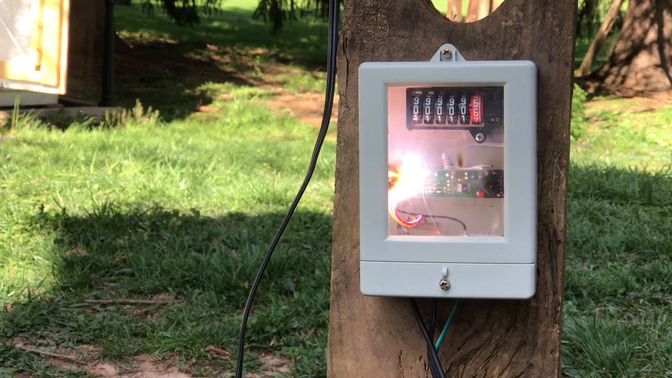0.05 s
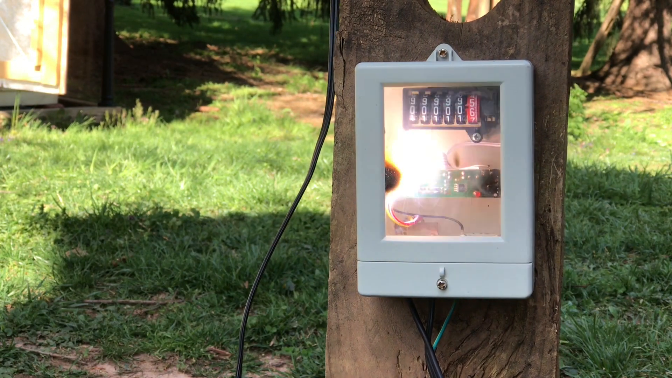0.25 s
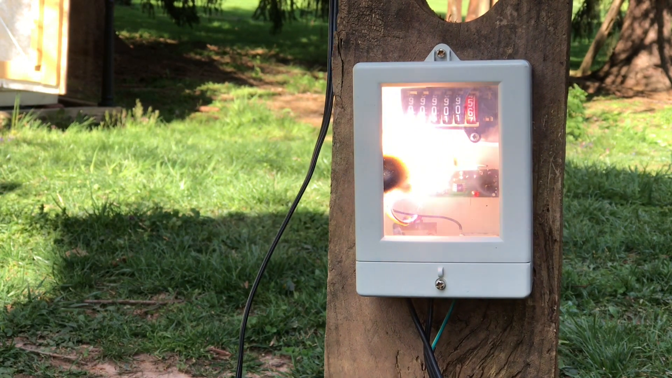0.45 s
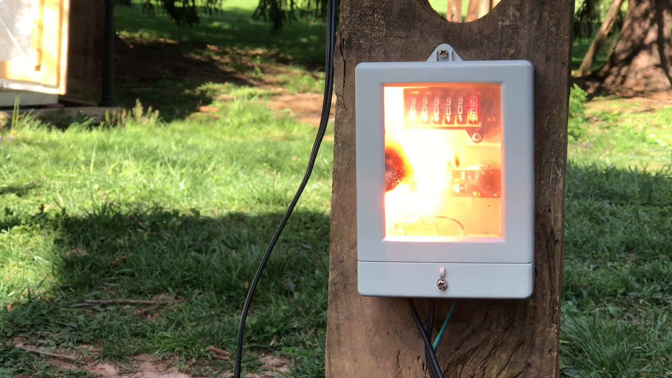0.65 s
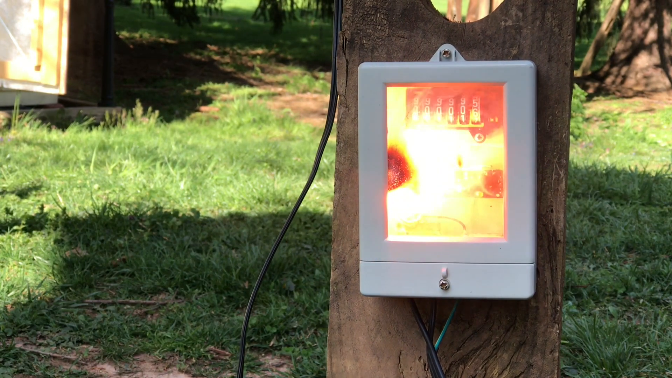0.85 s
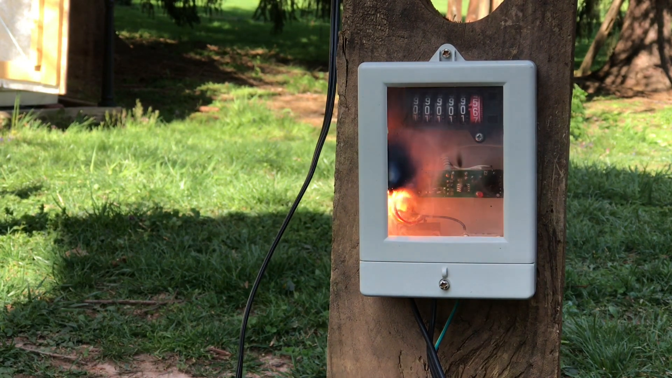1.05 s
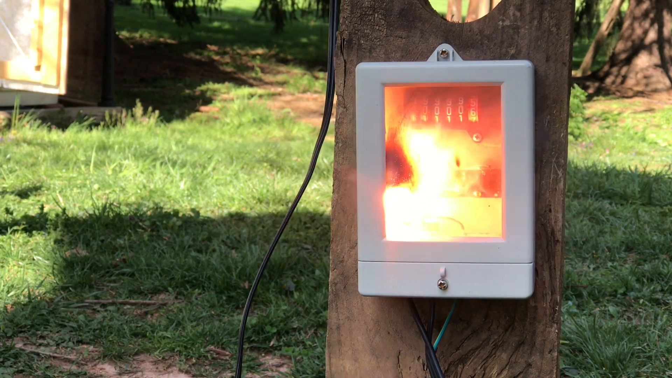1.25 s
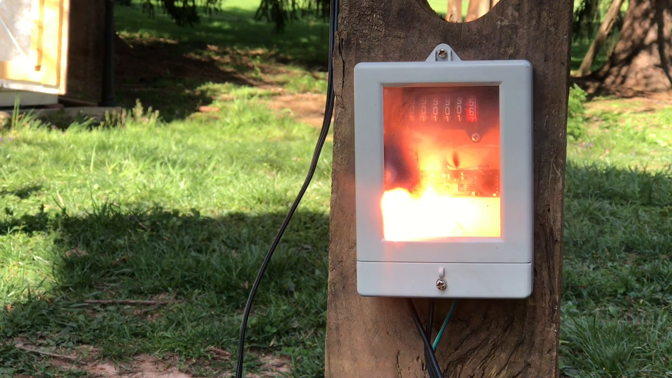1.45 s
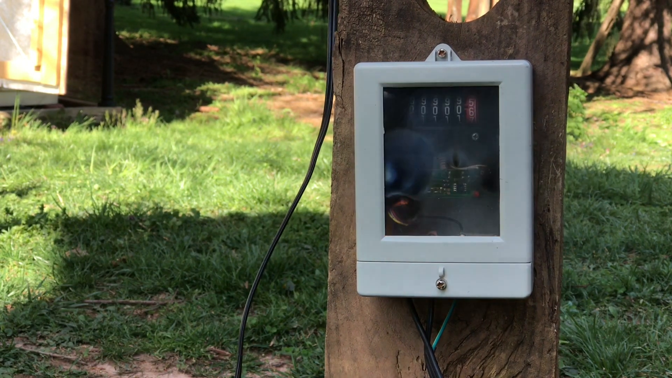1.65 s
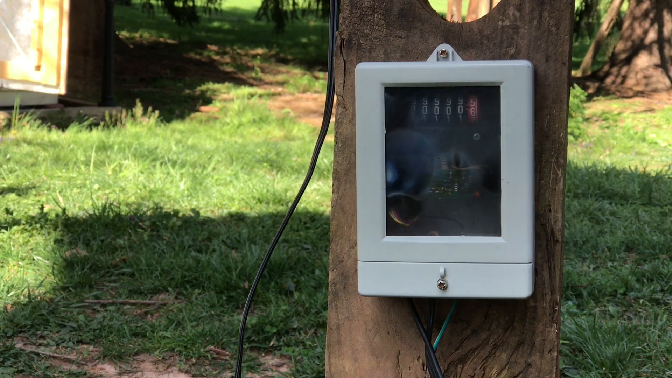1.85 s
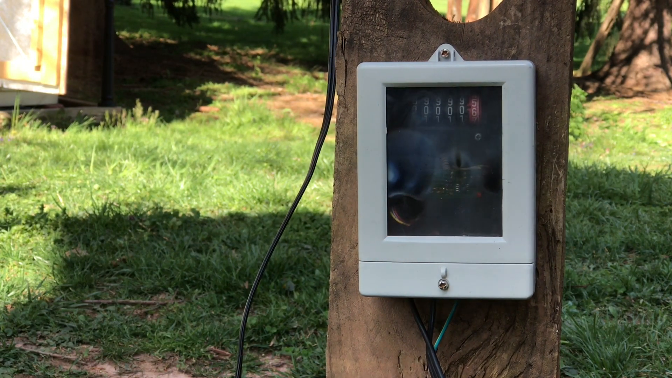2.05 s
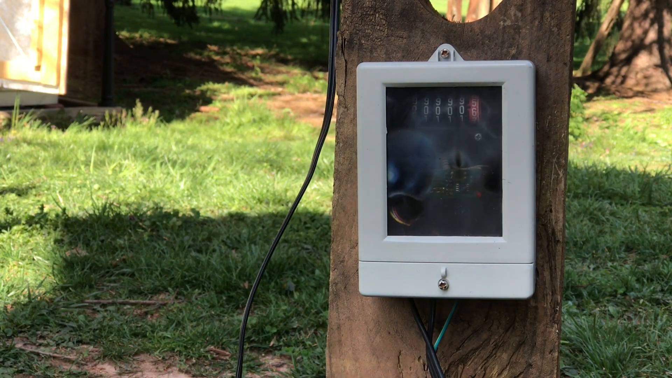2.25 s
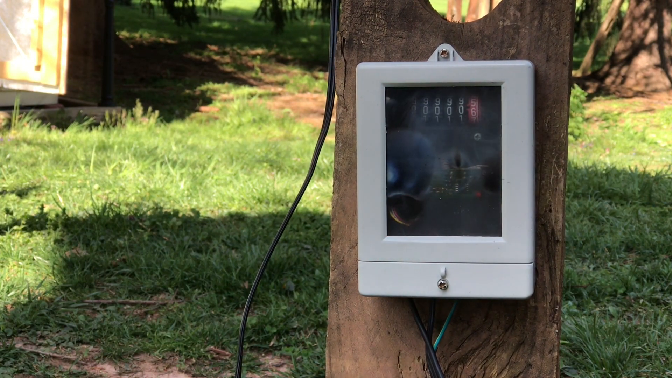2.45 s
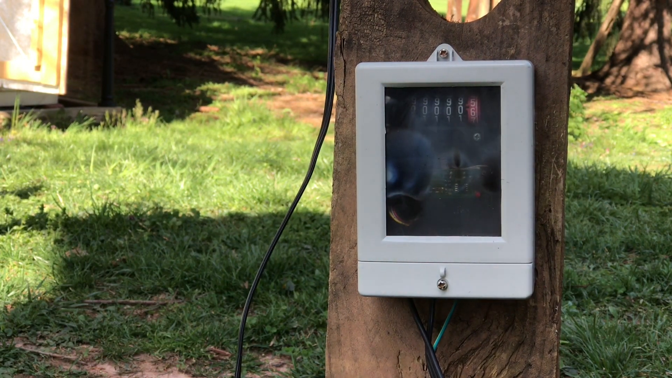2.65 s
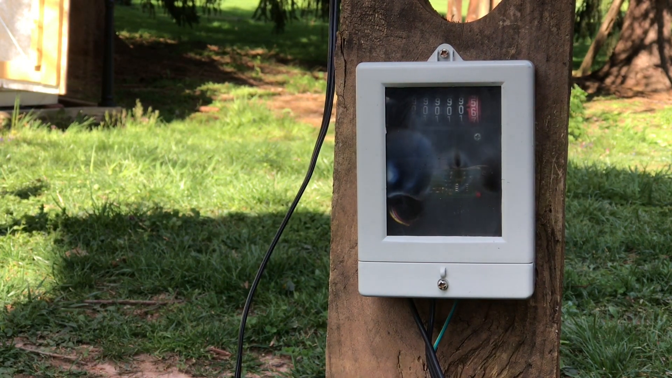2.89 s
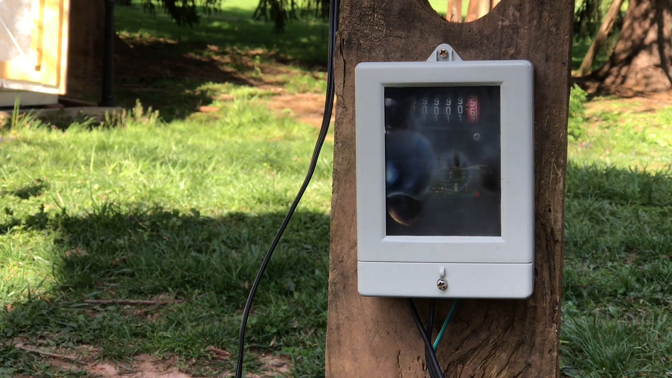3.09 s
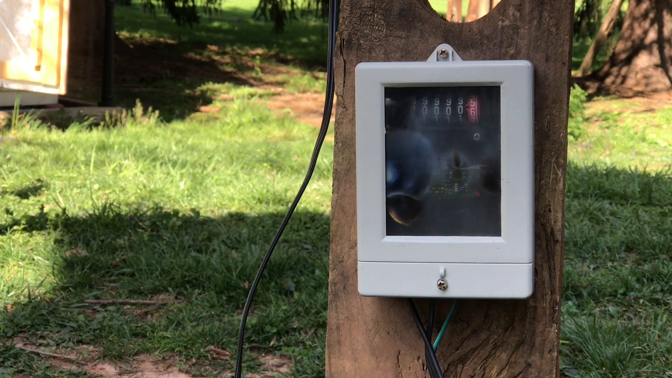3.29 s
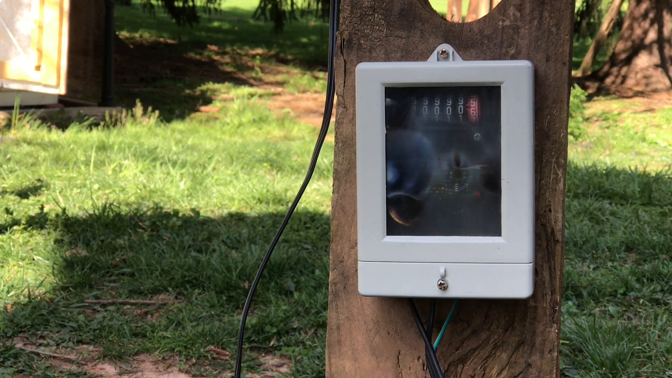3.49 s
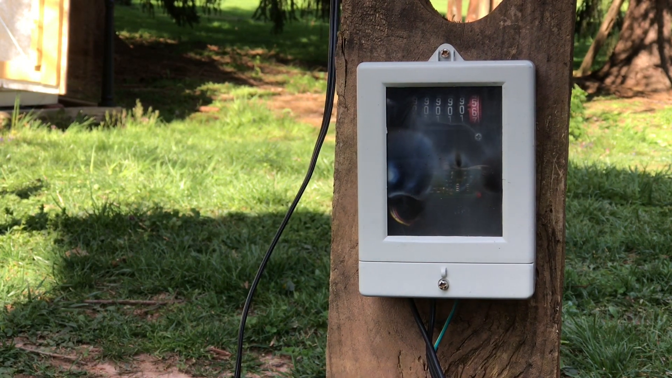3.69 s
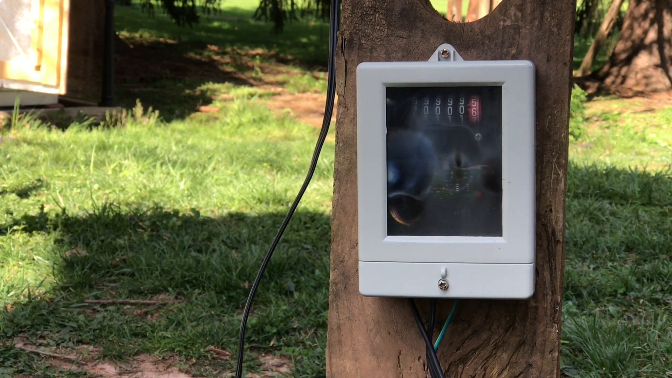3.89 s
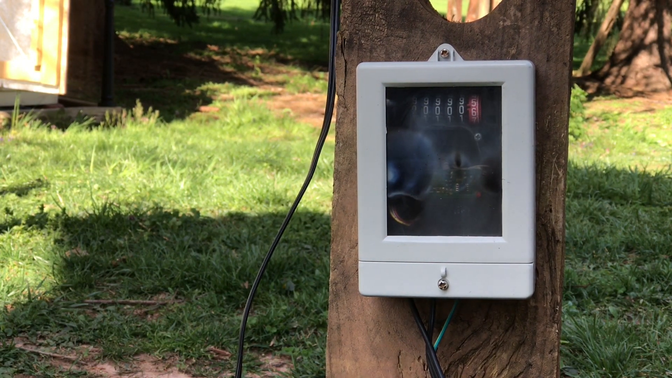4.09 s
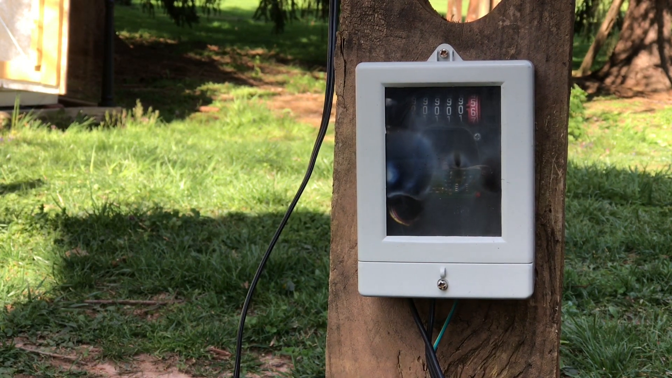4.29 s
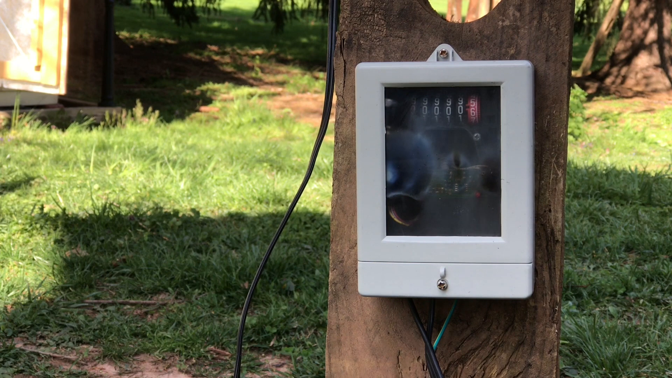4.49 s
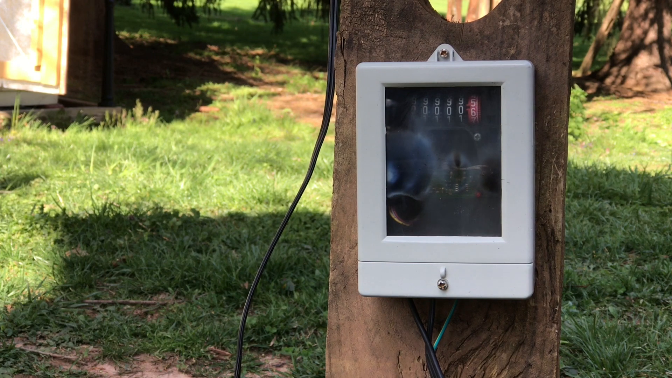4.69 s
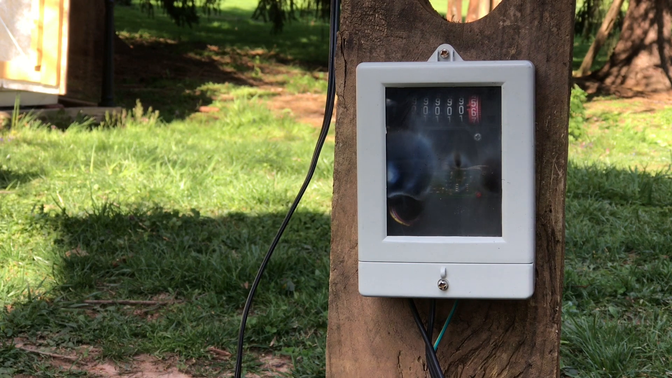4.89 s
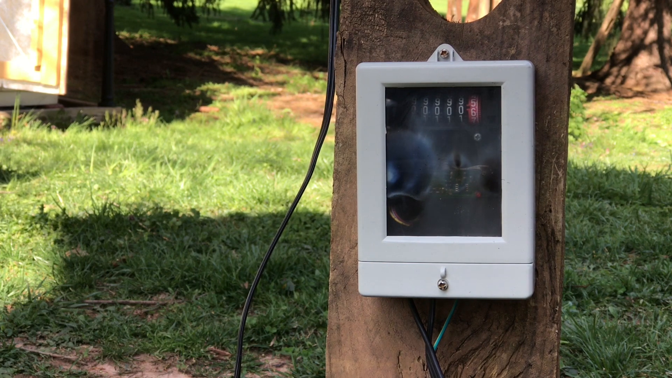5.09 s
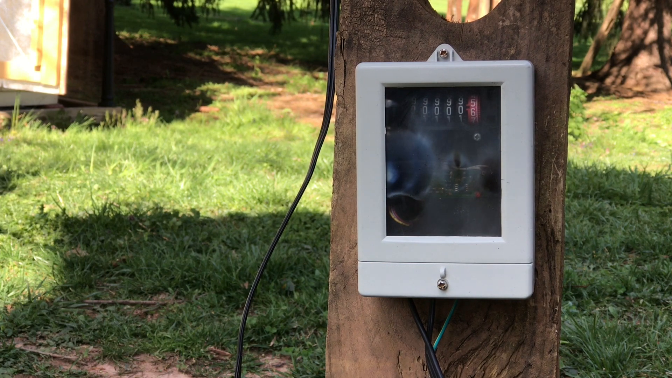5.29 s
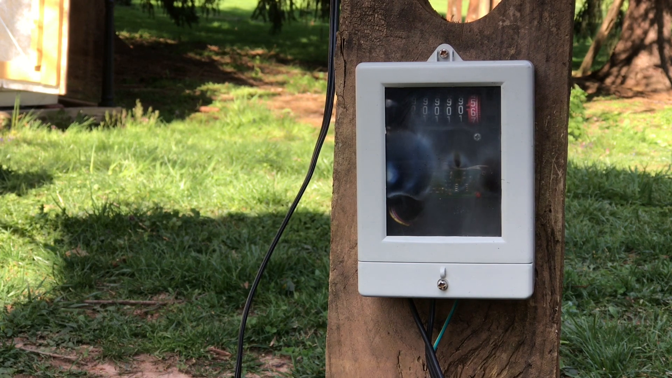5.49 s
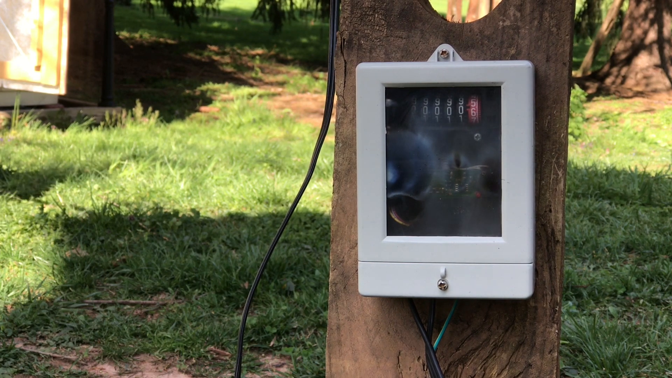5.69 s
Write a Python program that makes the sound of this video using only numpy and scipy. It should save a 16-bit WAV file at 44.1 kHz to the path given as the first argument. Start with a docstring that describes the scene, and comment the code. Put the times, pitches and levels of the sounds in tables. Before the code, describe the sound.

A fierce electric arc rasps and sizzles in a small plastic enclosure, fluctuating and bursting with snaps and puffs of flame. After roughly 1.6 seconds it stops with a pop. The remaining four seconds are quiet: irregular clicks, clacks and knocks from the cooling cover, the loudest near 2.9 seconds. The close microphone catches low wind buffeting, distant rumble and steady faint hiss, with little reverberation.

```python
"""Outdoors, close to an electricity meter on a post, as it burns out: an arc strikes on every half cycle
of the mains and buzzes and sizzles inside the plastic case. It flares up several times and dies with a pop.
Then the hot case ticks and cracks: noise snaps through resonances of the cover, each with a ringing spot.
A near slap and a thin yard tail answer. Light wind, as low noise, bumps the microphone over a faint
drone, rumble and hiss."""
import sys
import numpy as np
from scipy import signal
from scipy.fft import rfft, irfft, next_fast_len
from scipy.io import wavfile
from scipy.ndimage import map_coordinates

SR = 44100
rng = np.random.default_rng(int(sys.argv[2]) if len(sys.argv) > 2 else 0)


def inscribe(sig):
    """Save sig as 16-bit PCM at rate SR to the path in sys.argv[1].

    A 1-D sig is mono; a 2-D sig holds one channel per row.
    Samples are clipped to [-1, 1] before scaling.
    """
    pcm = np.round(np.clip(np.atleast_2d(sig).T, -1, 1) * 32767)
    wavfile.write(sys.argv[1], SR, pcm.astype(np.int16))


N = 253134

MAINS_HZ = 59.9
STRIKE_HZ = 2 * MAINS_HZ  # one strike each half cycle
BLOWOUT = 0.88  # the flame and the air in the case have changed for good by now [s]

# Spectrum of the turbulent hot gas, in the arc and in the flares: (frequency [Hz], density [dB per Hz])
FLAME_SPECTRUM = [(70, -13.5), (150, -2), (320, 2), (410, -12.5), (540, 4), (780, 1.5), (1080, -16),
                  (1330, -6), (1580, -17.5), (1820, -12.5), (2300, -40), (5000, -32)]


def amp(db):
    """Decibels to gain."""
    return 10 ** (np.asarray(db) / 20)


def unit(x):
    """Scale to rms 1."""
    return x / np.sqrt(np.mean(x ** 2) + 1e-20)


def along(points, hz):
    """Read (Hz, value) points on a log frequency axis."""
    f, v = np.transpose(points)
    return np.interp(np.log(hz + 1), np.log(f + 1), v)


def curves(rows):
    """One value per sample for each column after the time."""
    s, *cols = np.transpose(rows)
    return [np.interp(np.arange(N) / SR, s, c) for c in cols]


def wobble(rate):
    """A smooth random curve with rate knots a second."""
    knots = rng.standard_normal(int(N * rate / SR) + 4)
    return map_coordinates(knots, [np.arange(N) * rate / SR])


def filtered(x, response):
    """Multiply the spectrum of x by a response of frequency."""
    m = next_fast_len(len(x) + SR // 4)  # room for the filter to ring out
    return irfft(rfft(x, m) * response(np.fft.rfftfreq(m, 1 / SR)), m)[:len(x)]


def noise(spectrum):
    """Coloured noise of rms 1."""
    return unit(filtered(rng.standard_normal(N), lambda hz: amp(along(spectrum, hz))))


def coloured(x, spectrum, size=4096):
    """Pass x through the causal, minimum-phase filter with this spectrum."""
    cepstrum = irfft(np.log(amp(along(spectrum, np.fft.rfftfreq(size, 1 / SR)))))
    fold = np.r_[1, np.full(size // 2 - 1, 2), np.zeros(size // 2)]
    impulse = irfft(np.exp(rfft(cepstrum * fold)))
    return signal.fftconvolve(x, impulse)[:len(x)]


def resonate(x, modes):
    """Pass x through parallel (Hz, width Hz, dB) resonances."""
    def response(f):
        return sum(amp(db) * 1j * f * w / (c * c - f * f + 1j * f * w) for c, w, db in modes)
    return filtered(x, response)


def add(track, s, sound):
    """Mix a sound into a track at time s."""
    start = max(round(s * SR), 0)
    track[start:start + len(sound)] += sound[:N - start]


def burnt():
    """0 before the blowout, rising to 1 over the 10 ms that end at it."""
    return np.clip((np.arange(N) / SR - BLOWOUT) / .01 + 1, 0, 1)


def strikes(jitter, scatter_db):
    """One impulse per half cycle of the mains, each a little early or late (s), weak or strong (dB)."""
    count = int(STRIKE_HZ * N / SR)
    late, size = rng.standard_normal((2, count))
    when = (np.arange(count) + .4) / STRIKE_HZ + jitter * late
    return np.bincount(np.clip(when * SR, 0, N - 1).astype(int), amp(scatter_db * size), N)


def gate(pulses, t60):
    """Each impulse opens an envelope that dies away; the sum has rms 1."""
    return unit(signal.lfilter([1], [1, -amp(-60 / (t60 * SR))], pulses))


def kick(pulses, harmonics):
    """The pressure wave of a train of strikes, coloured at multiples of the strike rate to rms 1."""
    # Treble of the kick: (multiple of the strike rate, level [dB])
    kick_treble = [(11, -27.5), (13, -31.5), (15, -21.5), (19, -46.5), (33, -45.5)]
    spectrum = [(k * STRIKE_HZ, db) for k, db in [(.5, -15), *harmonics, *kick_treble]]
    return unit(coloured(-pulses, spectrum))


def case(x):
    """x rings the air in the case; the modes shift at the blowout and glide with the heat, a random warp."""
    # Resonances of the case before and after the blowout: (frequency [Hz], width [Hz], level [dB])
    clean_modes = [(3067, 20, 2.5), (3770, 23, -27), (3840, 44, 9), (3920, 39, 7.5), (4160, 27, -1),
                   (4670, 45, -1), (5450, 86, 1), (6300, 110, -42), (7700, 230, -16), (9240, 200, -12),
                   (9600, 210, -28), (9900, 250, -24)]
    burnt_modes = [(3100, 32, -23), (3620, 64, -3), (3916, 86, 7), (4460, 190, -12), (4860, 93, -0.5),
                   (5650, 91, 3), (6540, 33, -14), (7560, 130, -11.5), (7950, 82, -18), (9000, 130, -32),
                   (10300, 160, -9), (11400, 250, -20)]
    ring = resonate(x * (1 - burnt()), clean_modes) + resonate(x * burnt(), burnt_modes)
    return map_coordinates(ring, [np.arange(N) + .001 * SR * wobble(7)])


def walls(x):
    """Echoes between the walls of the case; heat and swirl make their delays drift, here at random."""
    out = x.copy()
    for delay, gain in [(.00045, .3), (.00095, .45), (.0016, -.4), (.0023, .3)]:  # (s, gain)
        lag = delay * SR * (1 + .025 * wobble(4))
        out += gain * x[np.round(np.arange(N) - lag).astype(int)]
    return unit(out)


def arc():
    """Every strike kicks the air in the case, stirs the flame and sets off a short sizzle."""
    # Course of the arc ahead of flicker and trims: (time [s], buzz [dB], sizzle [dB])
    arc_course = [(0.0, -46, -53), (0.12, -51.5, -58), (0.26, -47, -63), (0.38, -51, -63.5),
                  (0.495, -46.5, -61), (0.525, -54, -56), (0.57, -47, -56.5), (0.66, -47.5, -56),
                  (0.71, -53.5, -66.5), (0.985, -48, -61), (1.02, -59.5, -75), (1.2, -61, -61),
                  (1.31, -49.5, -59.5), (1.46, -50, -56.5), (1.61, -48.5, -67)]
    # Kick of a strike before and after the blowout: (multiple of the strike rate, level [dB])
    kick_clean = [(1, 0), (2, -4), (3, -10), (4, -5.5), (5, -5), (6, -3.5), (7, -12), (8, -19), (9, -26)]
    kick_burnt = [(1, 0), (2, -2), (3, -8), (4, -7), (5, -10), (6, -11), (7, -8), (8, -18), (9, -25)]
    # Hiss of the sizzle: (frequency [Hz], density [dB per Hz])
    sizzle_spectrum = [(2000, -3), (4000, 8.5), (6000, -1), (7200, -5), (9500, -0.5), (12500, -4),
                       (16000, -12)]
    arc_out, fade_out = 1.622, 0.0071  # the arc starts to go out, and takes this long [s]
    flicker_db, flicker_rate = 1.3, 13.57  # wander in strength [dB], [knots a second]
    full_arc_db = -50  # reference buzz of a full arc [dB]
    flame_db, flame_burnt_db = -2, -2  # flame against a full buzz; calmer again after the blowout [dB]
    flame_grows = 1.03  # flame dB per dB of buzz

    buzz_db, sizzle_db = curves(arc_course)
    buzz_db = buzz_db + flicker_db * wobble(flicker_rate)
    over_full_db = buzz_db - full_arc_db
    alive = np.clip((arc_out - np.arange(N) / SR) / fade_out + 1, 0, 1)
    after = burnt()

    pulses = strikes(jitter=.00005, scatter_db=1.8)
    buzz = amp(buzz_db) * ((1 - after) * kick(pulses, kick_clean) + after * kick(pulses, kick_burnt))

    # a stronger arc is slightly more turbulent for its buzz
    level_db = full_arc_db + flame_db + flame_burnt_db * after + flame_grows * over_full_db
    turbulence = gate(pulses, t60=.04) * rng.standard_normal(N)
    flame = amp(level_db) * unit(coloured(turbulence, FLAME_SPECTRUM))

    # boiling metal sputters less regularly than the arc strikes
    sputter = gate(strikes(jitter=.0005, scatter_db=3), t60=.03) * rng.standard_normal(N)
    ring = amp(0.55 * over_full_db + 0.78 * sizzle_db - 14.5) * unit(case(sputter))
    hiss = amp(sizzle_db - 6) * gate(pulses, t60=1.0) * walls(noise(sizzle_spectrum))
    return alive * (buzz + flame + ring + hiss)


def wind():
    """Eddies over a light breeze bump the microphone, each a low bump with a weaker, fluctuating top."""
    # Breeze between the eddies, before its swings: (time [s], level [dB])
    breeze_levels = [(0.0, -60.5), (3.9, -60), (4.3, -61.5), (5.7, -65)]
    # Eddies that bump the microphone: (time [s], peak [dB], length [s])
    gusts = [(0.035, -46, 0.1), (0.756, -43, 0.07), (1.08, -49.5, 0.1), (1.258, -41, 0.041),
             (1.779, -44.5, 0.065), (2.188, -46, 0.067), (2.86, -57, 0.039), (3.015, -46, 0.023),
             (3.2, -44.5, 0.048), (3.393, -45, 0.12), (3.841, -42.5, 0.1)]
    # Bump and fluttering top of an eddy: (frequency [Hz], density [dB per Hz])
    buffet_spectrum = [(15, -11), (40, 0), (75, 4), (120, -4.5), (190, -13.5), (300, -26.5), (500, -35.5),
                       (1000, -91)]
    flutter_spectrum = [(70, -14), (150, 7), (300, 1), (600, -28), (1500, -43)]
    swing_db, swing_rate = 3.5, 6.2  # the breeze is never quite steady [dB], [knots a second]

    t = np.arange(N) / SR
    breeze_db, = curves(breeze_levels)
    breeze = amp(breeze_db + swing_db * wobble(swing_rate)) ** 2
    eddies = sum(amp(db) ** 2 * np.exp(-(2 * (t - s) / length) ** 2) for s, db, length in gusts)
    buffet_db = 10 * np.log10(breeze + eddies)  # powers add
    low = amp(buffet_db) * noise(buffet_spectrum)
    flutter = amp(buffet_db - 19.5 + 4.8 * wobble(25)) * noise(flutter_spectrum)
    return low + flutter


def air():
    """Distant rumble and even hiss as coloured noise, and a low drone as a sine of wavering phase."""
    # The far, low drone: (frequency [Hz], level [dB])
    drone_tone = (45, -61)
    # The quiet background: (frequency [Hz], density [dB per Hz])
    air_spectrum = [(12, -55), (20, -1.5), (49, 3), (70, -37.5), (88, -6), (127, -6.5), (158, -16.5),
                    (198, -10.5), (255, -18.5), (293, -20), (527, -30), (678, -25), (1810, -34.5),
                    (14300, -41.5), (16000, -42.5)]
    hz, db = drone_tone
    drone = amp(db) * unit(np.sin(2 * np.pi * hz * np.arange(N) / SR + 1.8 * wobble(6.6)))
    return drone + amp(-56.5 + 0.17 * wobble(2.9)) * noise(air_spectrum)


def sputtering(length, count=8):
    """Impulses of one flare: the flash, then a weaker spit on each half cycle until length (s) is over."""
    spit_db, scatter_db = -7.5, 2  # spits against the flash, and their spread [dB]
    after = np.arange(1, count) / STRIKE_HZ
    lit = np.clip((length - after) * STRIKE_HZ + .5, 0, 1)
    sizes = lit * amp(spit_db + scatter_db * rng.standard_normal(count - 1))
    return np.bincount((np.r_[0, after] * SR).astype(int), np.r_[1, sizes], SR // 4)


def dying(pulses, t60):
    """Envelope of overlapping noise bursts, one per impulse; their powers add."""
    return np.sqrt(signal.lfilter([1], [1, -amp(-60 / (t60 * SR)) ** 2], pulses ** 2))


def flares():
    """Metal flashes to vapour: a spit of hiss rings the case over a jolt of pressure and a puff of flame."""
    # Flares: (time [s], strength [dB], top hiss [dB re strength], thump before trims [dB re strength],
    # sputtering goes on for [s])
    flare_events = [(0.0484, -32.5, -13, -10, 0.035), (0.0543, -23.5, -17, -20, 0.002),
                    (0.2533, -37.5, -17, -10, 0.012), (0.5553, -29, -2.5, -7, 0.027),
                    (0.6224, -30, -11.5, -20, 0.046), (0.7507, -39, -36, -1.5, 0.002),
                    (0.7836, -38, -40, -2, 0.002), (0.833, -37.5, -19, -2, 0.002),
                    (0.9554, -19.5, -19, -3, 0.002), (0.9632, -20.5, -14, -25, 0.002),
                    (0.983, -39, -14, -10, 0.002), (0.9914, -38.5, -8, -37, 0.002),
                    (1.3024, -29.5, -37, -5.5, 0.015), (1.43, -38, -9, -21, 0.002),
                    (1.5988, -39, -33, 2, 0.002)]
    # Hiss of a spit: (frequency [Hz], density [dB per Hz])
    spit_spectrum = [(590, -47), (1000, -20), (1420, -22), (2840, -52), (3050, -46), (3300, -35),
                     (3840, -10), (4210, -3), (6550, -4.5), (7190, -0.5), (16000, -1)]
    hiss_t60, puff_t60 = 0.05, 0.089  # [s]

    spit, ring, puff, jolt = np.zeros((4, N))
    for s, db, top_db, thump_db, length in flare_events:
        flashes = sputtering(length)
        fade = dying(flashes, hiss_t60)
        add(spit, s, amp(db + top_db) * fade)
        add(ring, s, amp(db - 16.5) * fade)
        add(puff, s, amp(db + thump_db - 6.5) * dying(flashes, puff_t60))
        add(jolt, s, -amp([db + thump_db + 25.5]))  # a single impulse
    hiss = spit * walls(noise(spit_spectrum))
    case_ring = ring * unit(case(rng.standard_normal(N)))
    return hiss + case_ring + puff * noise(FLAME_SPECTRUM) + coloured(jolt, FLAME_SPECTRUM)


def burst(x):
    """Scale a short sound to the energy of 10 ms at rms 1."""
    return x / np.linalg.norm(x) * np.sqrt(0.01 * SR)


def cracks():
    """Stress lets go in the plastic: a snap and a brief rattle through the cover; the spot rings on."""
    # Cracks of the hot plastic, levels as spread over 10 ms:
    # (time [s], knock [dB], clack [dB], tick [dB], ring frequency [Hz])
    crack_events = [(1.581, -66, -54.5, -78, 2270), (1.604, -45, -44, -78, 2200),
                    (1.673, -61, -64, -82, 1110), (2.235, -62.5, -65.5, -67, 1490),
                    (2.379, -58.5, -66, -53, 1520), (2.645, -65, -65.5, -61, 5330),
                    (2.719, -47, -62, -64.5, 1370), (2.91, -44.5, -35, -62.5, 2210),
                    (3.184, -49.5, -57, -60, 1330), (3.274, -51.5, -69, -78, 1090),
                    (3.293, -57, -54.5, -53.5, 12000), (3.612, -58.5, -49.5, -50.5, 7100),
                    (3.904, -57, -58, -61, 1540), (3.951, -65.5, -70, -81, 1570),
                    (4.271, -63, -62.5, -69, 2860), (4.288, -65, -71, -72, 1105),
                    (4.547, -86, -79, -70, 12900), (5.351, -55.5, -79, -87, 1080),
                    (5.393, -83, -71, -78, 2790), (5.529, -64.5, -62.5, -69, 1330)]
    # Resonances of the cover: (frequency [Hz], width [Hz], level [dB])
    cover_modes = [(630, 60, 0), (1040, 70, -2), (1450, 80, 0), (1990, 70, -1), (2260, 110, 4),
                   (2520, 120, 3), (2760, 130, 1), (4500, 350, 2), (6100, 400, -2), (7200, 500, 4),
                   (8400, 400, 0), (12700, 600, 2)]
    # Dull knock of the box, clack of its cover, tick of the break: (frequency [Hz], density [dB per Hz])
    spectra = ([(120, -7), (350, -1), (550, 6), (1400, -2), (2200, -23), (4000, -42), (16000, -88)], [(500, -53), (1400, -1.5), (2200, 3.5), (3000, -7.5), (3700, -27.5),
                               (8000, -64), (15000, -62)], [(1000, -27), (2000, -0.5), (3500, 1.5), (5500, 3),
                                              (8000, -5.5), (10500, -5.5), (13000, -5), (15000, -16)])
    # How strongly each sets the cracked spot ringing: one level [dB] for knock, clack and tick
    ring_drive_db = [-17.5, -18.5, -12]
    snap_t60, rattle_t60, rattle_db = 0.043, 0.052, 1.5  # [s], [s], [dB re snap]
    ring_t60 = 0.26  # of a ring at 2 kHz [s]

    out = np.zeros(N)
    t = np.arange(SR // 4) / SR
    for s, knock_db, clack_db, tick_db, ring_hz in crack_events:
        gains = amp([knock_db, clack_db, tick_db])
        decay = amp(-60 * t / snap_t60) + amp(rattle_db - 60 * t / rattle_t60)
        snap = rng.standard_normal(len(t)) * decay
        snap[0] += amp(16.5)  # the break itself
        cover = snap + resonate(snap, cover_modes)
        body = sum(gain * burst(coloured(cover, spectrum)) for gain, spectrum in zip(gains, spectra))
        # a cluster of close modes beats unevenly; high ones die sooner
        cluster = unit(resonate(rng.standard_normal(len(t)), [(ring_hz, .05 * ring_hz, 0)]))
        fade = amp(-60 * t / ring_t60 * np.sqrt(ring_hz / 2000))
        add(out, s, body + np.dot(gains, amp(ring_drive_db)) * fade * cluster)
    return out


def yard(x):
    """Post, ground and trees scatter a short, thin tail: noise that dies at its own pace in each band."""
    # Decay of the tail: (frequency [Hz], t60 [s])
    yard_decay = [(200, 0.54), (2200, 0.33), (7000, 0.46), (15000, 0.34)]
    scatter_hz = 795  # longer waves pass the post and the trees largely unscattered
    hz, t, z = signal.stft(rng.standard_normal(SR // 2), SR, nperseg=256)
    fade = amp(-60 * t / along(yard_decay, hz)[:, None])
    tail = signal.istft(z * fade, SR, nperseg=256)[1]
    tail = filtered(tail, lambda f: f ** 2 / (f ** 2 + scatter_hz ** 2))
    late = np.pad(x, (round(.004 * SR), 0))  # the tail starts 4 ms late
    return signal.fftconvolve(late, tail / np.linalg.norm(tail))[:N]


def scene():
    """The meter close by, its scattered tail, one slap from a few metres off, and the weather."""
    buzz, bursts = arc(), flares() + cracks()
    slap = amp(-12.5) * np.pad(bursts, (round(0.025 * SR), 0))[:N]
    tail = yard(amp(-7.0) * buzz + amp(-15) * bursts)
    return (buzz + bursts + slap + tail + wind() + air())[None]


def record(dry):
    """The recorder cuts steeply above its band limit."""
    top_hz = 16200
    return np.array([filtered(channel, lambda hz: 1 / (1 + (hz / top_hz) ** 120)) for channel in dry])


dry = scene()
out = record(dry)
inscribe(out)
```